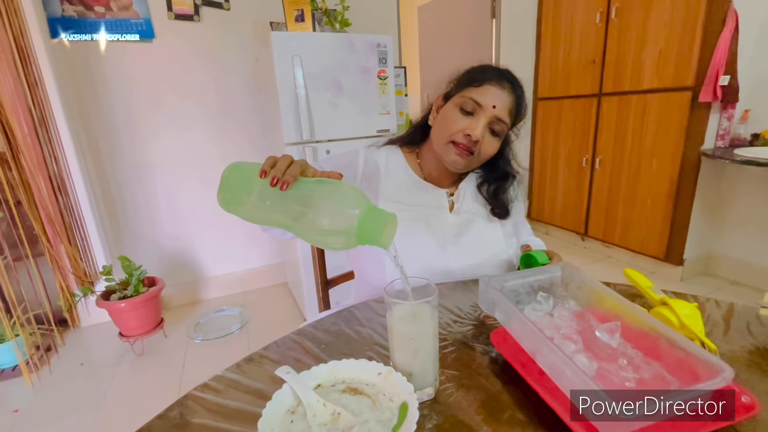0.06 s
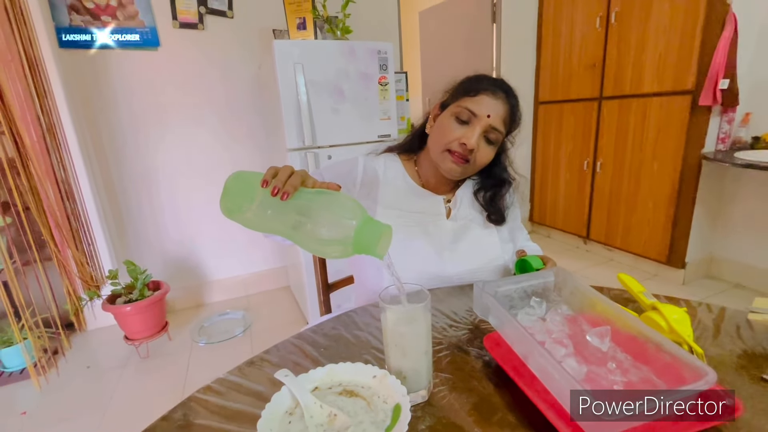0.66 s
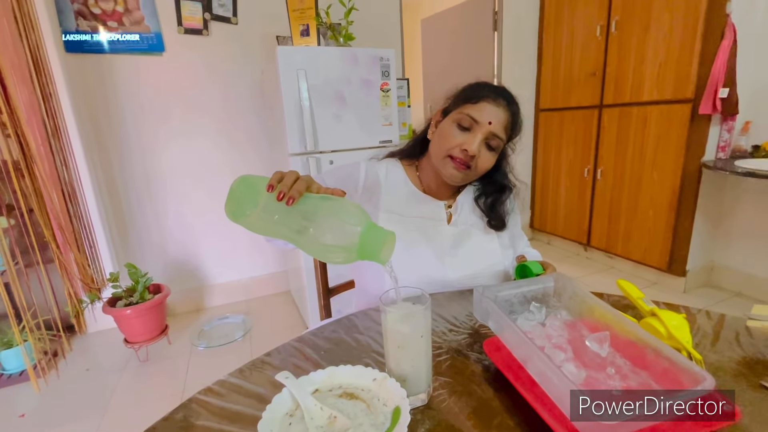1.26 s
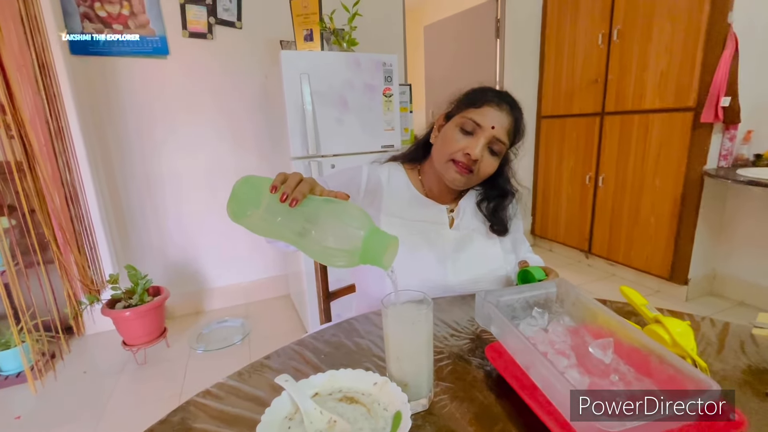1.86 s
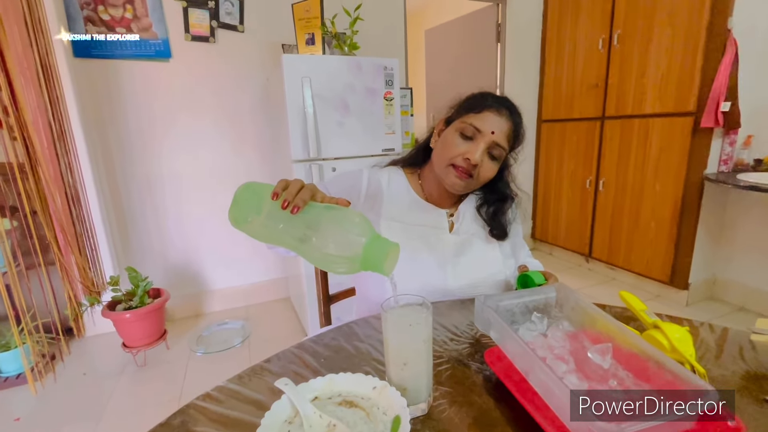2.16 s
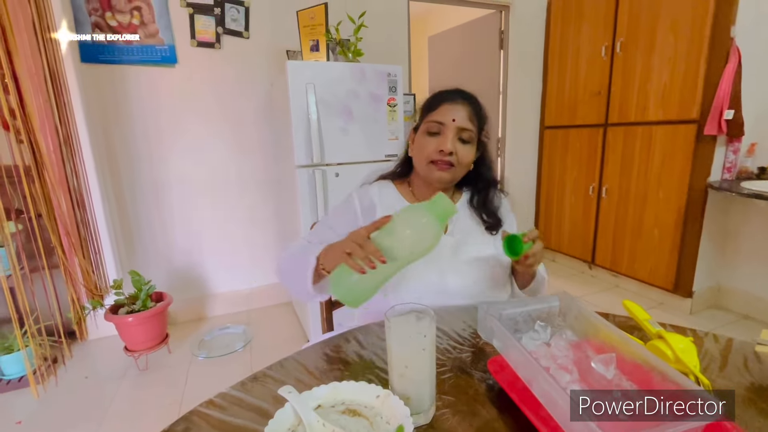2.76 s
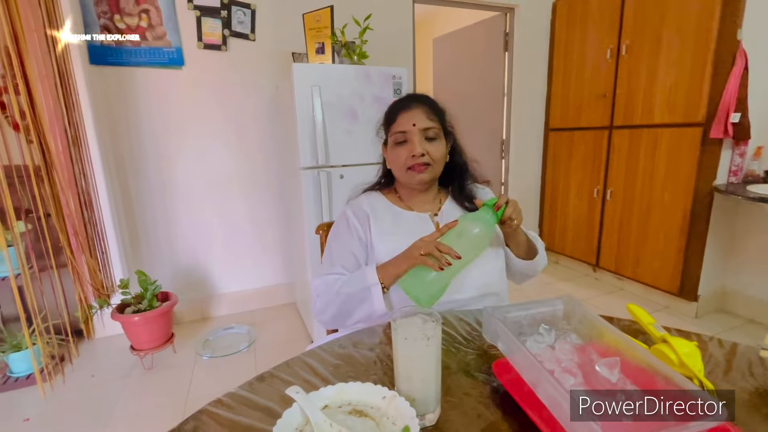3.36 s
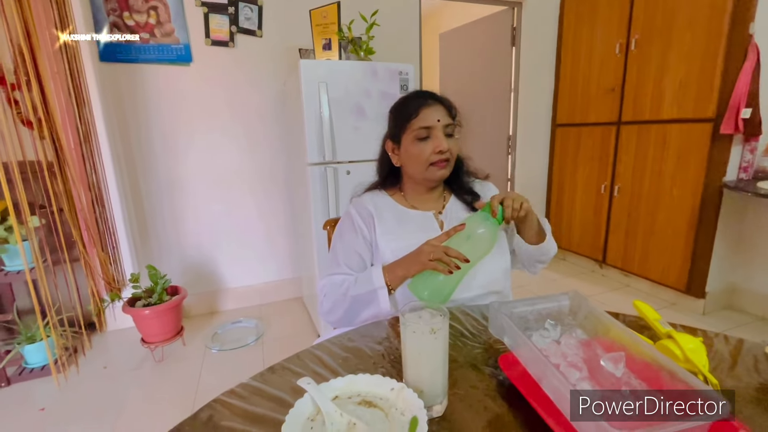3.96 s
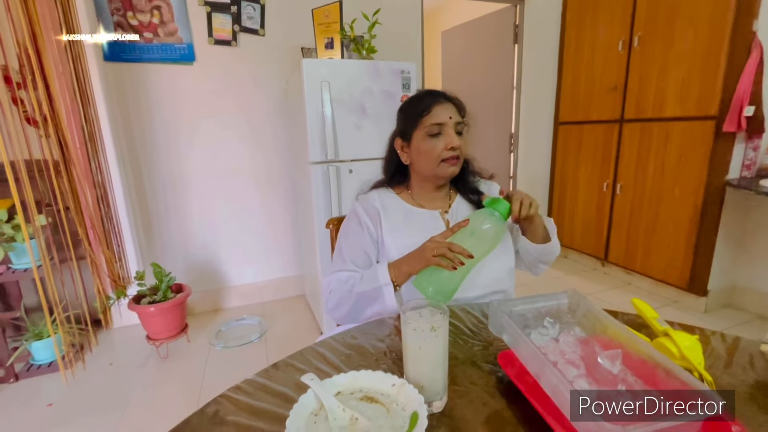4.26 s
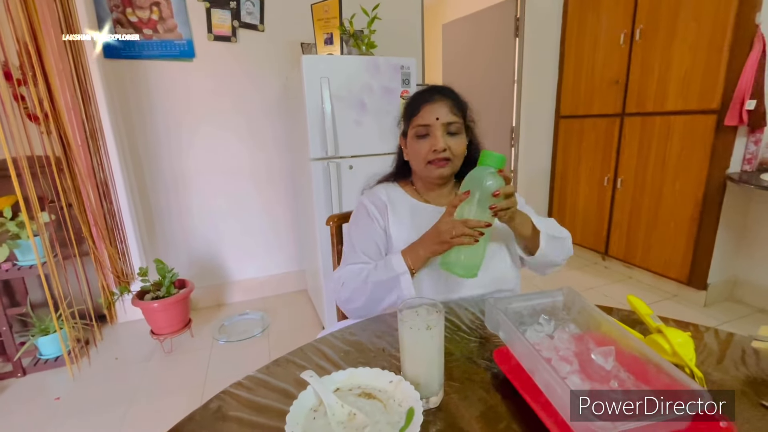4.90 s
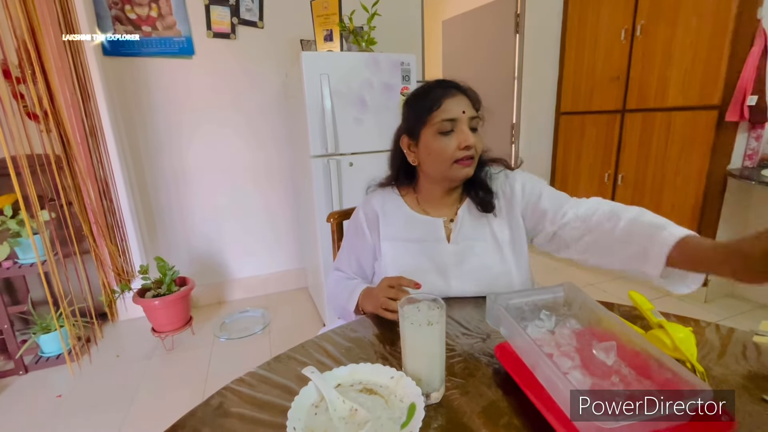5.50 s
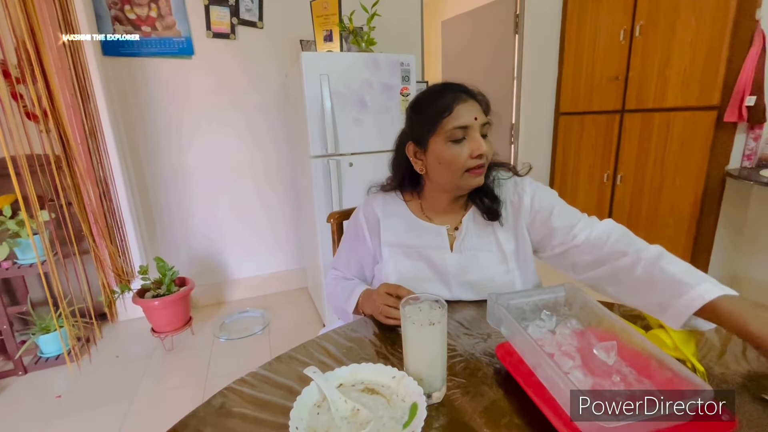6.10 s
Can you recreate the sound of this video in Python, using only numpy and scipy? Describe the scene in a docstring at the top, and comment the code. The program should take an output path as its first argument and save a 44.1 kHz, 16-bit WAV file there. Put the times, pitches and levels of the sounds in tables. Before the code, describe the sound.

From the start, water trickles softly from a plastic bottle into a nearly full glass, with uneven gurgles, distinct little plops and tiny spitting bubbles. The stream dips around 1 second, turns fizzier near 1.8 seconds and breaks into drips, with a soft low bump at 2.4 seconds and the last plops just before 3 seconds. The cap then hits the neck with a hollow plastic knock, followed by a sharp cluster of clacks around 3.5 seconds. Lighter clicks and faint rasping turns continue until about 5 seconds as it is tightened. After a soft bump, the bottle is set down hard at 5.6 seconds, the loudest sound: a slapping thud with a brief low ring from the tabletop and a smaller knock just after. Everything is nearby and roughly central, in a bare tiled room with short reverberation and a faint steady rush of air.

```python
"""Water pours from a plastic bottle into a nearly full glass, trickling, plopping and spitting
as trapped air bubbles resonate. The cap is knocked onto the neck, exciting the bottle's modes,
and screwed tight in a few turns that rasp by stick-slip friction. The bottle is then set down
hard: its base thuds and the table top rings. A bare, tiled room adds reverberation."""
import sys
import numpy as np
from scipy import signal
from scipy.fft import rfft, irfft, next_fast_len
from scipy.io import wavfile

SR = 44100
rng = np.random.default_rng(int(sys.argv[2]) if len(sys.argv) > 2 else 0)


def persist_wave(psi):
    """Save psi, clipped to +-1, as 16-bit WAV."""
    counts = np.round(np.clip(psi, -1, 1) * 32767).astype(np.int16)
    wavfile.write(sys.argv[1], SR, np.atleast_2d(counts).T)


N = 275184

# The stream in the glass. Each row: time in seconds, gurgle level in dB, fizz level in dB.
STREAM_LEVELS = [(0.0, -44, -65), (0.17, -59, -68), (0.48, -47, -71), (0.62, -62.5, -69),
                 (0.82, -48.5, -73), (1.06, -78, -79), (1.18, -56.5, -60), (1.61, -56.5, -81),
                 (1.76, -44, -55), (1.82, -52.5, -45.5), (2.01, -50.5, -53), (2.2, -67.5, -63),
                 (2.48, -52.5, -58), (2.72, -94, -61)]
# Single bubbles. Each row: start in seconds, level in dB, pitch in Hz, relative splash in dB.
SINGLE_BUBBLES = [(0.052, -32, 3700, -30), (0.123, -44.5, 3600, 2.5), (0.382, -39, 1700, -9),
                  (0.43, -32.5, 1620, -13), (0.432, -29.5, 770, -30), (0.446, -33.5, 600, -11.5),
                  (0.501, -31.5, 1400, -15), (0.626, -40.5, 2910, -19), (0.68, -38.5, 3740, -25),
                  (0.7, -35, 1514, -11), (0.768, -32, 1110, -19), (0.819, -37.5, 1395, -11),
                  (1.048, -42.5, 3810, -5.5), (1.386, -38.5, 1080, -15), (1.477, -43, 1140, -51),
                  (1.557, -43.5, 1500, -8), (1.601, -39.5, 1170, -1.5), (1.677, -34, 2420, 7),
                  (1.919, -33.5, 1100, -7), (2.014, -38.5, 2170, -2.5), (2.103, -40, 1470, 1.5),
                  (2.275, -40.5, 1090, -6), (2.409, -37, 1176, -2), (2.66, -51, 1080, 11),
                  (2.744, -41, 1600, -1), (2.783, -33.5, 2470, -1), (2.877, -36.5, 1020, -1)]
# Blows on the table. Each row: start in seconds, thud in dB, crack in dB, contact cutoff in Hz.
TABLE_BLOWS = [(2.408, -31.5, -72, 114.5), (5.178, -33, -57, 142), (5.628, -26.5, -19, 1500),
               (5.633, -10.5, -18, 3000), (5.646, -28, -30, 1500), (5.772, -24.5, -37, 600),
               (6.169, -48.5, -45.5, 600)]
# Plastic sliding. Each row: time of fastest sliding in seconds, level in dB, half-length in seconds.
SLIDES = [(2.84, -50, 0.12), (3.673, -46.5, 0.074), (4.074, -48, 0.053), (4.448, -46.5, 0.04),
          (4.713, -59.5, 0.052), (5.17, -63.5, 0.11)]
# Cap impacts. Each row: start in seconds, level in dB, relative crack in dB, relative click in dB.
CAP_IMPACTS = [(2.954, -15, -14, -22), (2.983, -25, -19, -27), (3.148, -23.5, -9.5, -18),
               (3.431, -32, -4, -7.5), (3.442, -15, -12.5, -10), (3.459, -21, 1, -10),
               (3.469, -29.5, 2, -23), (3.547, -32, -11, -30), (3.693, -30, -25, 1),
               (3.72, -32.5, -9.5, -48.5), (3.991, -30, -15.5, -48), (4.062, -31, -14, -36),
               (4.3, -29.5, -5.5, -10), (4.463, -34, -21, 4), (4.951, -44.5, -16.5, -10)]

# Spectral shapes. Each row: frequency in Hz, relative spectral density in dB.
FALLING_SPECTRUM = [(60, -59), (350, -34), (520, -4), (750, -11.5), (1100, -9.5), (1550, -5), (1760, 1),
                    (1980, -7.5), (2500, -16), (3300, -37), (3750, -2), (4500, -45), (6500, -27),
                    (7600, -15), (8500, -25), (15500, -20)]  # the stream while it falls far
BRIMMING_SPECTRUM = [(60, -43), (350, -54), (550, -4), (900, -11), (1130, 8), (1400, -7.5), (2400, 2),
                     (3000, -20), (4000, -19), (5200, -26.5), (9000, -30), (13000, -29), (15500, -26)]  # the stream once the glass is full
AIR_SPECTRUM = [(15, -61), (25, -18), (64, 8), (178, -1.5), (233, 1), (349, -5.5), (537, 3), (895, -4.5),
                (1140, -7.5), (2850, -18.5), (3930, -17.5), (5580, -29.5), (9050, -30), (12200, -40.5),
                (15500, -82)]  # the still room
SPLASH_SPECTRUM = [(60, -37), (500, -42.5), (1200, 0.5), (2400, -3), (4000, 10), (5500, -3), (10000, -8.5),
                   (15000, -33)]  # water slapping water
SLAP_SPECTRUM = [(30, -50), (100, -22), (400, 6), (1100, 0.5), (1800, -6), (3000, -10.5), (4500, -18),
                 (5500, -23), (9000, -27.5), (13500, -39.5), (16000, -66)]  # a blow on the table
RASP_SPECTRUM = [(40, -45), (300, -17), (500, 4), (630, 28), (850, 11.5), (1500, 18), (2600, 9.5),
                 (4000, 3.5), (5500, -1), (8500, 3.5), (12500, -8.5), (15000, -15)]  # sliding plastic
HOLLOW_SPECTRUM = [(30, -68), (60, -42), (95, -23), (123, 6), (155, -11), (210, -11.5), (300, -13.5),
                   (400, -20.5), (900, -51.5)]  # the hollow bottle under rubbing hands
SNAP_SPECTRUM = [(40, -15), (300, -12), (500, -0.5), (900, -11), (1500, 0.5), (2500, -5), (3000, -7.5),
                 (4200, -17.5), (5500, -20), (14000, -47)]  # plastic striking plastic
CLICK_SPECTRUM = [(1000, 2), (2400, 10), (3200, 9), (4300, 11), (5600, 1), (9000, 4), (12500, -7.5),
                  (15000, -24)]  # the fine edge of a snap
TICK_SPECTRUM = [(2000, -3), (4000, -14), (9000, -18), (15000, -21)]  # a bursting bubble

# Normal modes. Each row: frequency in Hz, relative level in dB, time to decay by 60 dB in seconds.
BASE_MODES = [(72.6, -10.5, 0.072), (111, -5.5, 0.092), (194, 1, 0.069), (249, 7.5, 0.031), (333, 1, 0.04),
              (410, -12, 0.058)]  # the water-filled base
TABLE_MODES = [(122, -7, 0.55), (181, -9, 0.52), (232, -10, 0.35), (296, -11, 0.36), (430, -18, 0.48),
               (698, -8, 0.099), (1073, -19, .15), (1300, -20, 0.15)]  # the table top
BOTTLE_MODES = [(206, -25, 0.44), (532, -3.5, 0.047), (620.4, 2.5, 0.054), (672.3, 1.5, 0.04),
                (1000, -6.5, 0.037), (1112, -10.5, 0.03), (1390, -4.5, 0.014), (2830, -35, 0.075)]  # the capped bottle
WALL_MODES = [(127.2, -13.5, 0.19)]  # the bottle's flexing wall

# Diffuse sound at the microphones. Each row: frequency in Hz, left-right correlation.
COHERENCE = [(60, 0.78), (150, 0.94), (300, 0.47), (700, 0.26), (1400, 0.11), (2500, -0.18), (6000, 0.16)]
# The room's decay. Each row: frequency in Hz, reverberation time in seconds.
REVERB_TIMES = [(100, 0.78), (300, 0.44), (1000, 0.72), (4000, 0.58), (9000, 0.54), (15000, 0.046)]
# The microphones' unequal colour. Each row: frequency in Hz, left minus right in dB.
MIC_MISMATCH = [(60, 1.5), (110, -1.7), (200, 0.8), (380, 1), (700, 2), (1290, 1.5), (2380, -2.1),
                (4400, -0.5), (8120, -2.4), (15000, -2.5)]


def amp(db):
    """Amplitude grows tenfold for every 20 dB."""
    return 10 ** (np.asarray(db) / 20)


def unit(x):
    """Normalisation to an rms of 1."""
    return x / np.sqrt(np.mean(x ** 2) + 1e-20)


def along(points, hz):
    """Interpolation of (Hz, value) points on a logarithmic frequency axis."""
    freqs, values = np.transpose(points)
    return np.interp(np.log(hz + 1), np.log(freqs + 1), values)


def decay(t, t60):
    """Exponential damping: 60 dB in a time t60."""
    return np.exp(-np.log(1000) * t / t60)


def filtered(x, response):
    """Linear filtering multiplies the spectrum by a frequency response."""
    size = x.shape[-1]
    padded = next_fast_len(size + 8192)
    return irfft(rfft(x, padded) * response(np.fft.rfftfreq(padded, 1 / SR)), padded)[..., :size]


def coloured(x, spectrum):
    """A minimum-phase filter of unit energy imposes a spectral shape causally."""
    size = 2048
    cepstrum = irfft(np.log(amp(along(spectrum, np.fft.rfftfreq(size, 1 / SR)))))
    fold = np.r_[1, np.full(size // 2 - 1, 2), 1, np.zeros(size // 2 - 1)]
    kernel = irfft(np.exp(rfft(cepstrum * fold)))
    return signal.fftconvolve(x, kernel / np.linalg.norm(kernel))[:len(x)]


def band(x, low_hz, high_hz):
    """A causal band-pass falls by 12 dB per octave on either side."""
    return signal.sosfilt(signal.butter(2, [low_hz, high_hz], "band", fs=SR, output="sos"), x)


def add(track, s, sound):
    """Superposition: a sound adds to the track from s seconds on."""
    start = max(round(s * SR), 0)
    track[start:start + len(sound)] += sound[:max(len(track) - start, 0)]


def scattered(from_s, to_s, count):
    """Stratified events: one random time per slot, with size and pitch deviations within +-1."""
    times = from_s + (to_s - from_s) * (np.arange(count) + rng.random(count)) / count
    return zip(times, 2 * rng.random((count, 2)) - 1)


def grains(per_second, spread_db):
    """Shot noise: tiny independent impacts of uneven size, rms 1."""
    occurs = rng.random(N) < per_second / SR
    size = np.minimum(rng.exponential(size=N), 4)
    sign = rng.choice([-1, 1], N)
    return unit(occurs * amp(spread_db * size) * sign)


def burst(spectrum, t60, attack_s):
    """A brief impact radiates a broadband, decaying transient."""
    t = np.arange(SR // 10) / SR
    noise = rng.standard_normal(len(t))
    return coloured(noise * decay(t, t60) * (1 - np.exp(-t / attack_s)), spectrum)


def ring(modes, scatter_db, attack_s, size):
    """A struck body vibrates as a sum of damped modes, each at a slightly random strength."""
    t = np.arange(size) / SR
    out = np.zeros(size)
    for k, (hz, db, t60) in enumerate(modes):
        gain = (-1) ** k * amp(db + scatter_db * rng.standard_normal())
        out += gain * decay(t, t60) * np.sin(2 * np.pi * hz * t)
    return out * (1 - np.exp(-t / attack_s))


def diffuse(size):
    """A diffuse noise field is coherent at two close microphones only in the bass."""
    def weights(hz):
        angle = np.arccos(along(COHERENCE, hz)) / 2
        return np.array([np.cos(angle), np.sin(angle)])
    mid, side = filtered(rng.standard_normal((2, size)), weights)
    return np.array([mid + side, mid - side])


def bubble(hz, cycles, rise):
    """An air bubble is a damped oscillator whose pitch climbs as it nears the surface."""
    life = cycles * SR / hz
    age = np.arange(int(life) + 2) / life
    phase = 2 * np.pi * cycles * (age + rise * age ** 2 / 2)
    return np.sin(phase) * decay(age, 1) * (1 - np.exp(-age * cycles * 2))


def trickle(count, end_s, cycles, spread_db):
    """Small bubbles resonate at pitches spread evenly over the octaves; rms 1 during the pour."""
    swarm = np.zeros(N)
    low_hz, high_hz = 450, 14000
    for when, pitch, size, life in rng.random((count, 4)):
        hz = low_hz * (high_hz / low_hz) ** pitch
        gain = amp(-spread_db * np.log(size + 0.037)) * hz
        add(swarm, when * end_s, gain * bubble(hz, cycles * (0.5 + life), rise=0.12))
    return swarm / np.std(swarm[:int(end_s * SR)])


def stream(brim_s=1.14, brim_rise_s=0.16, crossover_hz=2800):
    """Bubble resonances and spray fill the glass; their colour changes as the water nears the rim."""
    t = np.arange(N) / SR
    times, *levels = np.transpose(STREAM_LEVELS)
    gurgle_db, fizz_db = [np.interp(t, times, db, right=-120) for db in levels]
    swarm = trickle(count=3000, end_s=times[-1], cycles=38, spread_db=6)
    spray = amp(-4) * grains(per_second=2000, spread_db=3)
    full = np.clip((t - brim_s) / brim_rise_s, 0, 1)

    def in_glass(x, passband):
        blend = (1 - full) * coloured(x, FALLING_SPECTRUM) + full * coloured(x, BRIMMING_SPECTRUM)
        part = filtered(blend, passband)
        return part / np.std(part[:int(times[-1] * SR)])
    gurgle = in_glass(swarm, lambda hz: hz < crossover_hz)
    fizz = in_glass(swarm + spray, lambda hz: hz >= crossover_hz)
    return amp(gurgle_db - 5) * gurgle + amp(fizz_db - 4.5) * fizz


def room_air():
    """Ambient noise arrives from all sides as a quiet, steady rush."""
    return amp(-54) * unit(filtered(diffuse(N), lambda hz: amp(along(AIR_SPECTRUM, hz))))


def plop(hz, splash_db, follow_s=0.014, follow_octaves=0.91):
    """A splash traps a bubble, its pitch inverse to its radius, which sheds three followers."""
    radius = 1510 / hz  # relative to a bubble that rings for 39 cycles
    out = amp(splash_db) * burst(SPLASH_SPECTRUM, t60=0.027, attack_s=0.00069)
    add(out, 0, bubble(hz, cycles=39 / radius, rise=0.022))
    follower_gain = amp(-8) * min(radius, 1)  # large bubbles shed more strongly
    for late, pitch in rng.random((3, 2)):
        follower_hz = hz * 2 ** (follow_octaves * (2 * pitch - 1))
        add(out, follow_s * late, follower_gain * bubble(follower_hz, cycles=24, rise=0.06))
    return out


def single_bubbles():
    """Bubbles large and small resonate in the glass, then in the righted bottle: glugs, plops, pings."""
    out = np.zeros(N)
    for s, db, hz, splash_db in SINGLE_BUBBLES:
        add(out, s, amp(db) * plop(hz, splash_db))
    return out


def spits(hz=9800, scatter_db=6, scatter_octaves=0.25):
    """Tiny bubbles burst at the surface, each with a tick and a brief, high resonance."""
    out = np.zeros(N)
    for s, (size, pitch) in scattered(from_s=0, to_s=2.4, count=24):
        gain = amp(-46.5 + scatter_db * size)
        add(out, s, gain * bubble(hz * 2 ** (scatter_octaves * pitch), cycles=26, rise=0.078))
        add(out, s, gain * amp(-3) * burst(TICK_SPECTRUM, t60=0.0024, attack_s=0.0001))
    return out


def drips(hz=1180, scatter_db=3, scatter_octaves=0.3):
    """A thinning stream breaks into drops of nearly one size, which plop at similar pitches."""
    out = np.zeros(N)
    for s, (size, pitch) in scattered(from_s=1.25, to_s=2.5, count=12):
        drop = plop(hz * 2 ** (scatter_octaves * pitch), splash_db=-2.5)
        add(out, s, amp(-45 + scatter_db * size) * drop)
    return out


def table_blows(lowest_hz=29):
    """Impacts excite base and table, softer contacts mainly the low modes. Returns blows and ring."""
    blows, table_ring = np.zeros(N), np.zeros(N)
    hardest_db = max(row[1] for row in TABLE_BLOWS)
    for s, thud_db, crack_db, cutoff_hz in TABLE_BLOWS:
        thud = ring(BASE_MODES, scatter_db=3.5, attack_s=0.00033, size=SR // 4)
        top = ring(TABLE_MODES, scatter_db=2, attack_s=0.0009, size=2 * SR // 3)
        ring_db = thud_db + 1 - 0.29 * (hardest_db - thud_db)  # soft bumps damp the ring
        add(blows, s, amp(crack_db) * burst(SLAP_SPECTRUM, t60=0.089, attack_s=0.0005))
        # the table is too small to radiate below lowest_hz
        add(blows, s, amp(thud_db) * band(thud, lowest_hz, cutoff_hz))
        add(table_ring, s, amp(ring_db) * band(top, lowest_hz, cutoff_hz))
    return blows, table_ring


def handling(hold_from_s=2.71, hold_to_s=4.85, fade_s=0.16):
    """Stick-slip friction: plastic rasps as the cap turns and as the bottle slides through the hands."""
    t = np.arange(N) / SR
    sliding = sum(amp(db) * np.exp(-((t - s) / half_s) ** 2) for s, db, half_s in SLIDES)
    rasp = sliding * coloured(grains(per_second=5000, spread_db=4), RASP_SPECTRUM)
    held = np.clip(1 + np.minimum(t - hold_from_s, hold_to_s - t) / fade_s, 0, 1)
    rub = amp(-57.5) * held * coloured(grains(per_second=530, spread_db=3.5), HOLLOW_SPECTRUM)
    return rasp + rub


def cap_knocks():
    """The cap hits the neck and jumps its thread; each impulse rings the bottle and flexes its wall."""
    out = np.zeros(N)
    for s, db, crack_db, click_db in CAP_IMPACTS:
        add(out, s, amp(db) * ring(BOTTLE_MODES, scatter_db=-0.5, attack_s=0.00023, size=SR // 4))
        crack_gain = amp(db + crack_db)
        add(out, s, crack_gain * burst(SNAP_SPECTRUM, t60=0.064, attack_s=0.0002))
        add(out, s, crack_gain * ring(WALL_MODES, scatter_db=-0.5, attack_s=0.0039, size=SR // 2))
        add(out, s, amp(db + click_db) * burst(CLICK_SPECTRUM, t60=0.0082, attack_s=0.0002))
    return out


def direct_path(x, lag_ms, pan_db):
    """Direction gives time and level differences; positive values favour the left microphone."""
    sides = np.array([[0.5], [-0.5]])
    pair = filtered(x, lambda hz: np.exp(2j * np.pi * hz * sides * lag_ms / 1000))
    return pair * amp(sides * pan_db)


def room_response(build_s=0.00033, early_gain=2.03, early_s=0.011):
    """The room's impulse response is a diffuse field in which each frequency decays at its own rate."""
    hz, t, spectra = signal.stft(diffuse(int(0.8 * SR)), SR, nperseg=256)
    tail = signal.istft(spectra * decay(t, along(REVERB_TIMES, hz)[:, None]), SR, nperseg=256)[1]
    age = np.arange(tail.shape[1]) / SR
    tail = tail / np.linalg.norm(tail[0]) * (1 - np.exp(-age / build_s))
    # the table top and the dishes reflect the treble within a few milliseconds
    early = signal.lfilter(*signal.butter(2, 1100, "high", fs=SR), tail * np.exp(-age / early_s))
    return tail + early_gain * early


def reverberation(x):
    """Convolution gives the room's reverberation, with a fresh random tail for each half second."""
    echo, block = np.zeros((2, N + 2 * SR)), SR // 2
    for start in range(0, N, block):
        wet = signal.fftconvolve(x[None, start:start + block], room_response(), axes=1)
        echo[:, start:start + wet.shape[1]] += wet
    return echo[:, :N]


def scene():
    """Direct and reverberant fields add; the glass is in front, the table end slightly to the side."""
    pour = stream()
    plops = single_bubbles() + drips()
    ticks = spits()
    cap, hands = cap_knocks(), handling()
    blows, table_ring = table_blows()
    direct = direct_path(pour + plops + ticks, lag_ms=0.085, pan_db=0)
    direct += direct_path(cap, lag_ms=0.11, pan_db=0)
    direct += direct_path(hands, lag_ms=0.28, pan_db=1.5)
    direct += direct_path(blows + table_ring, lag_ms=-0.012, pan_db=2)
    # the share of each source that reaches the walls
    water = amp(-1.5) * pour + amp(-5) * plops + amp(-8) * ticks
    solids = amp(-2) * cap + amp(-1.5) * (hands + blows) + amp(-14) * table_ring
    return direct + reverberation(water + solids) + room_air()


def record(dry):
    """The microphones differ in frequency response, and the treble fades to zero at the band limit."""
    limit_hz, fade_hz = 16200, 2000
    colour = lambda hz: amp(along(MIC_MISMATCH, hz) * np.array([[0.5], [-0.5]]))
    treble_fade = lambda hz: np.clip((limit_hz - hz) / fade_hz, 0, 1)
    return filtered(dry, lambda hz: colour(hz) * treble_fade(hz))


dry = scene()
out = record(dry)
persist_wave(out)
```